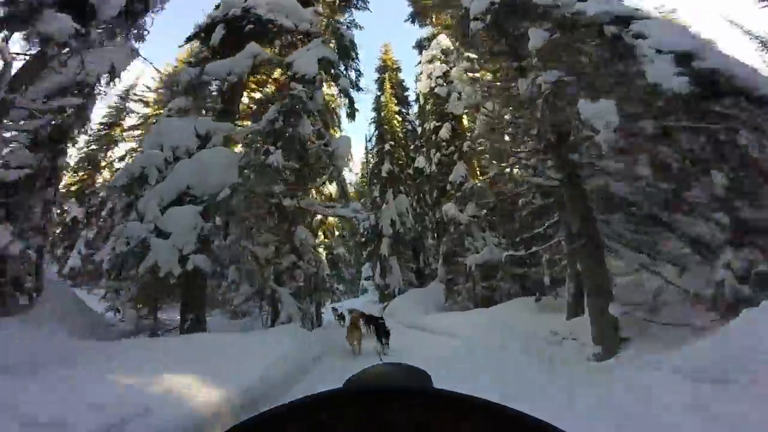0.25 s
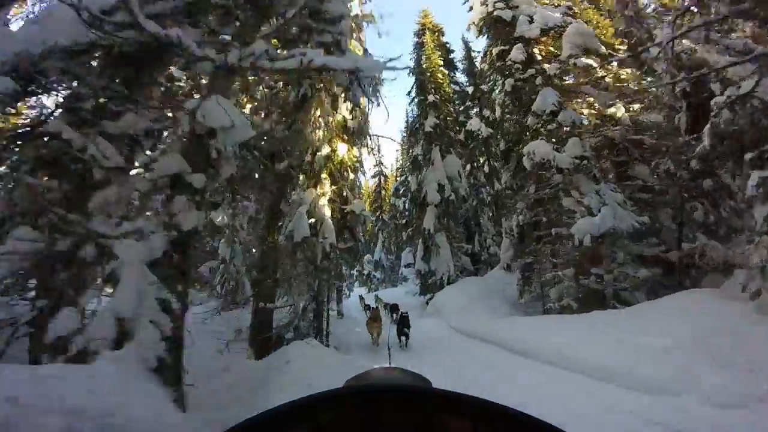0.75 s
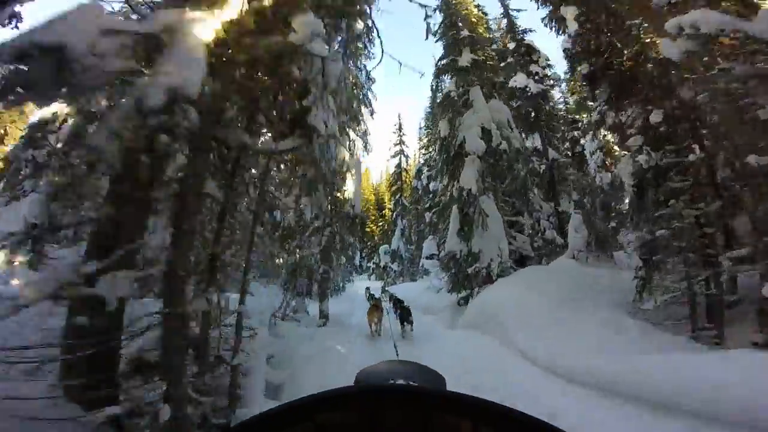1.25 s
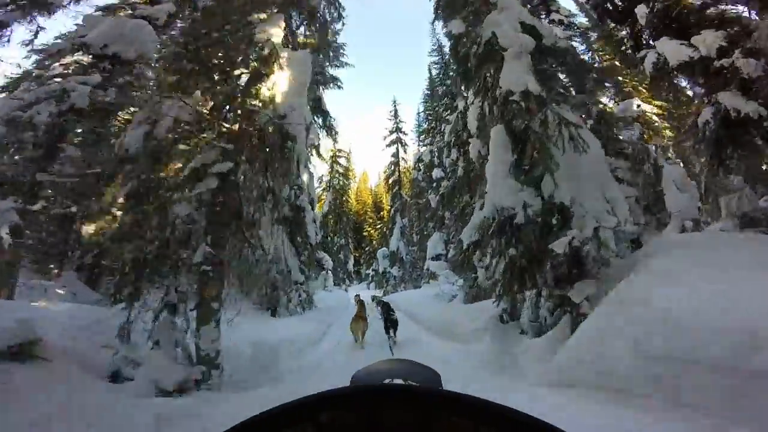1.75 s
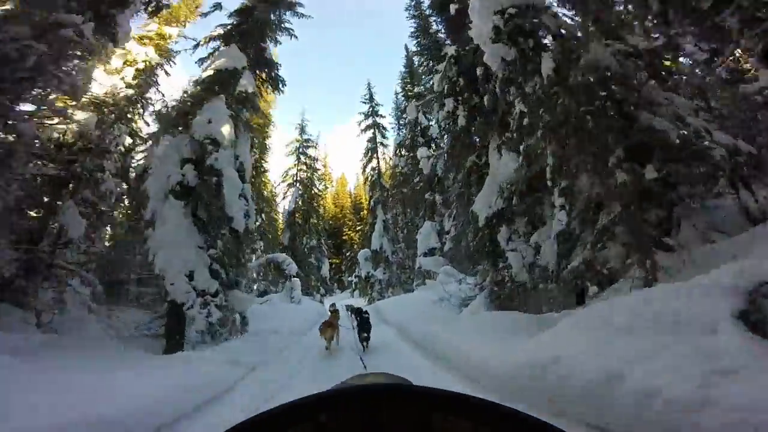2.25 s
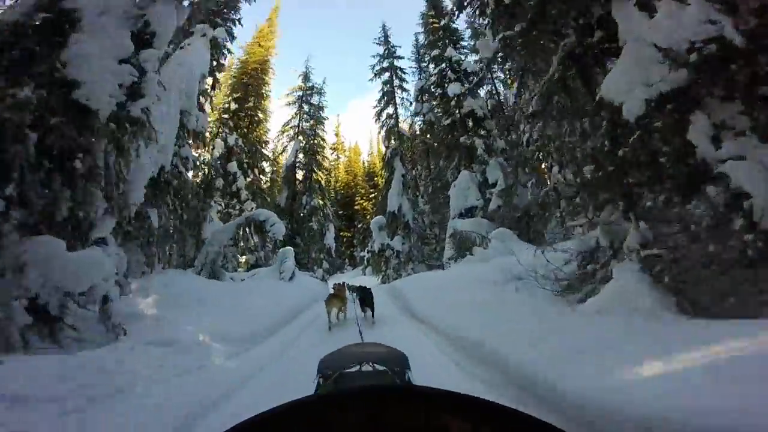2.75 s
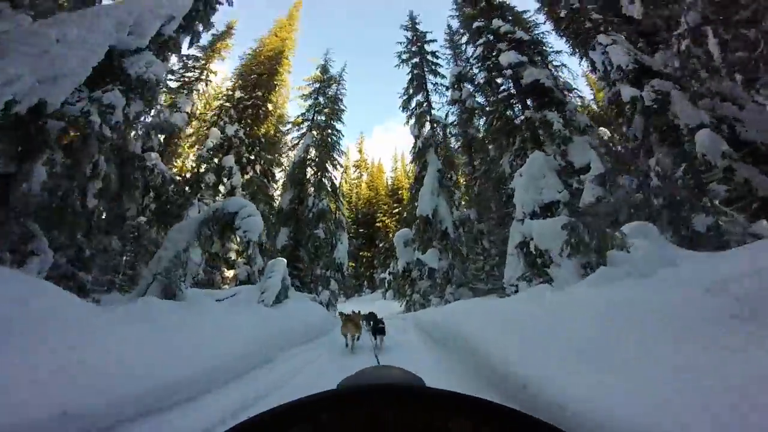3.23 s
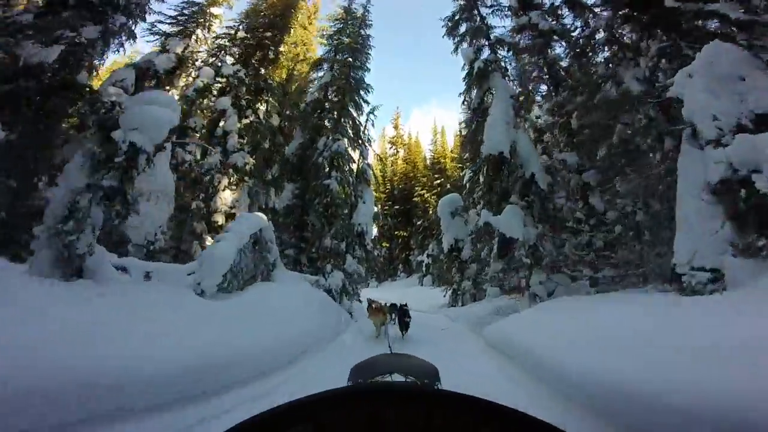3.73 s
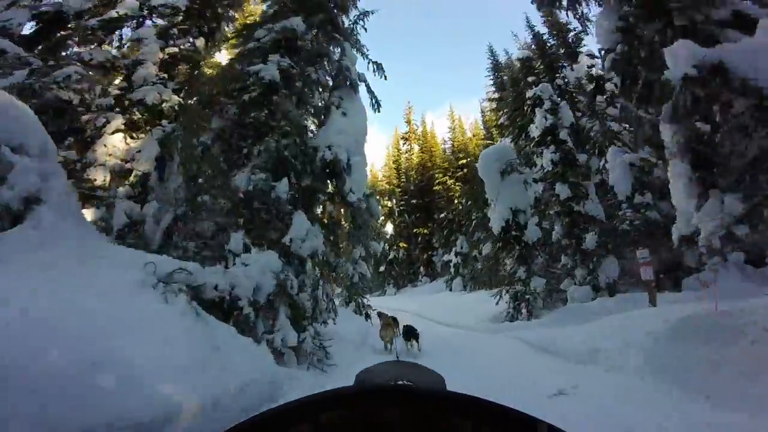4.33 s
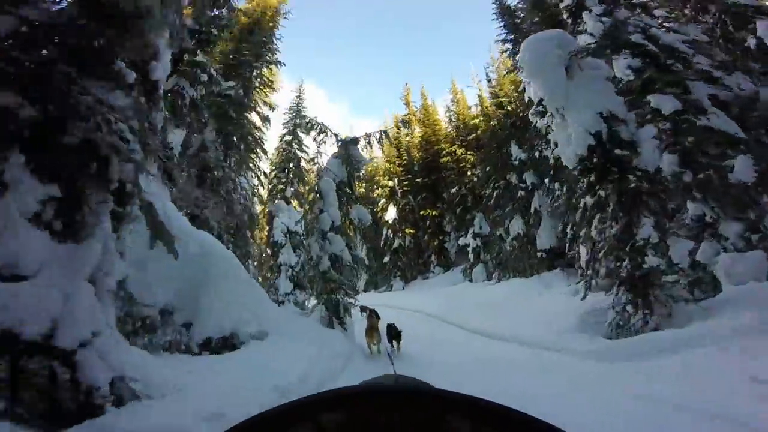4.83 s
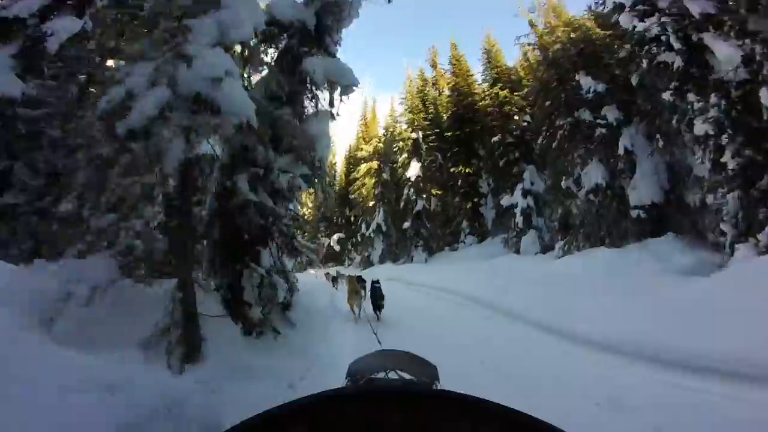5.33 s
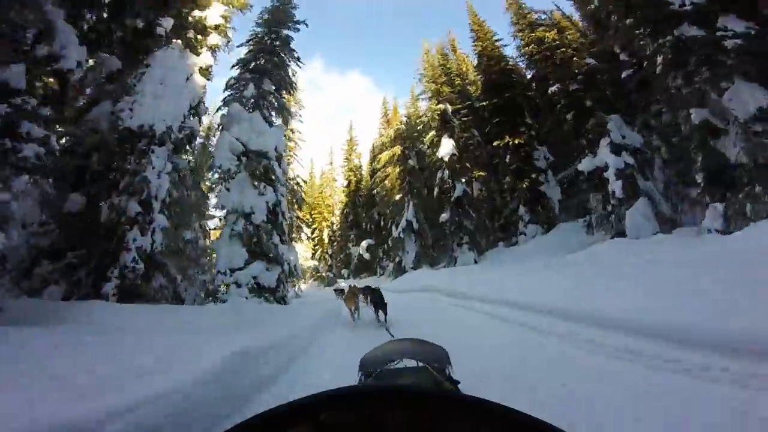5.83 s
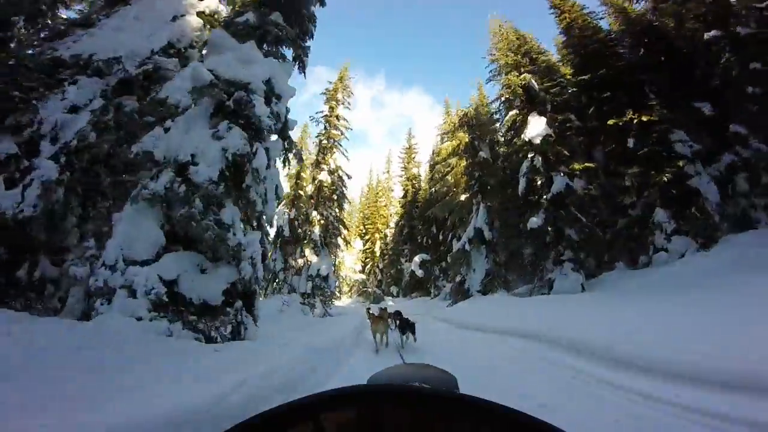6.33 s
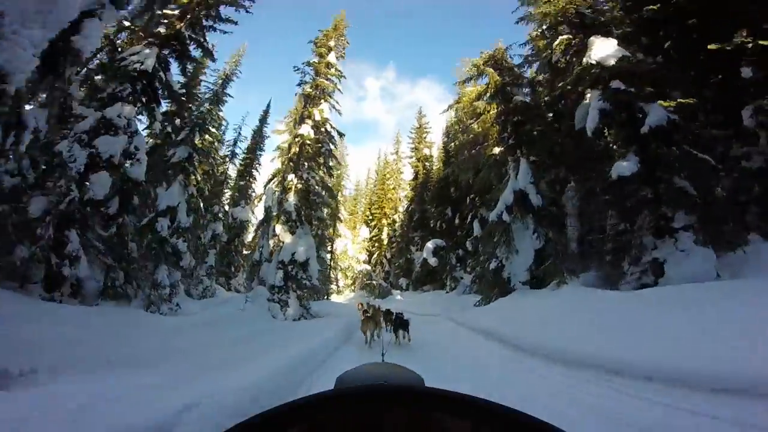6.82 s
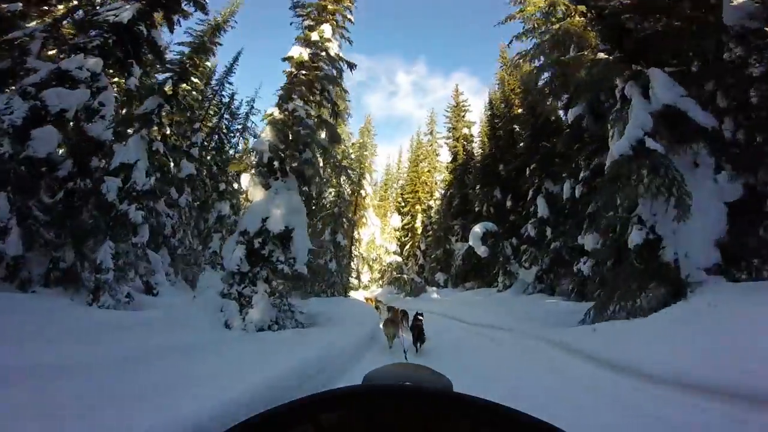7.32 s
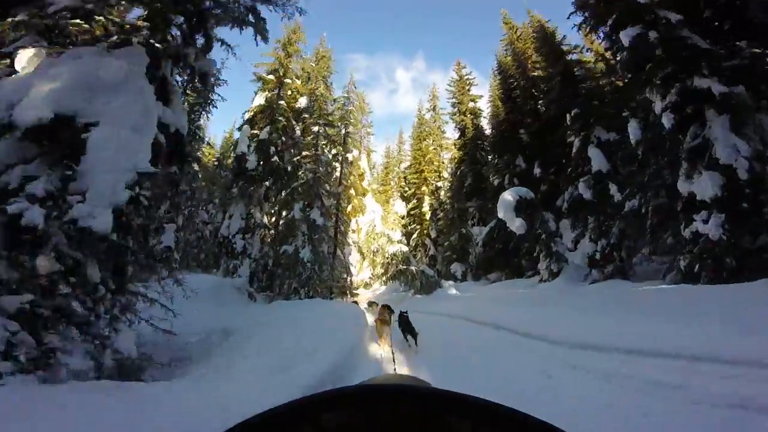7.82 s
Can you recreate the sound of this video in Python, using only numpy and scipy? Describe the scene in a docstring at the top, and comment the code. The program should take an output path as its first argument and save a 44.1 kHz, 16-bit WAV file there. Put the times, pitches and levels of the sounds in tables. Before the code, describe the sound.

A sled runs over packed snow, its runners making a steady, grainy hiss while ruts shake it into an uneven low rumble. A little after two seconds, hard bumps bring dull thumps and a cluster of sharp knocks from the joints; more follow a second later. Around five seconds come another heavy thump and short crusty scrapes, then the ride grows smoother. The microphone is fixed to the sled, close and without echo.

```python
"""A packed trail in a snowy forest, heard close up from a microphone fixed to a running dog sled.
The runners grind snow grains, which ring through the frame under a fine hiss of powder.
Ruts shake the sled into a low rumble; bumps thump, edges scrape on crust and the joints knock.
Now and then a runner sticks and slips with a thin squeal, and crumbs of ice tick against the sled."""
import sys
import numpy as np
from scipy import signal
from scipy.fft import rfft, irfft
from scipy.io import wavfile
from scipy.ndimage import uniform_filter1d

SR = 44100
rng = np.random.default_rng(int(sys.argv[2]) if len(sys.argv) > 2 else 0)


def pcm_store(signal):
    """Save signal as 16-bit PCM."""
    levels = np.round(np.clip(np.atleast_2d(signal), -1, 1) * 32767)
    wavfile.write(sys.argv[1], SR, levels.astype(np.int16).T)


N = 355887
TIME = np.arange(N) / SR
BINS = np.fft.rfftfreq(16384, 1 / SR)  # Hz
BOUNCE_HZ, BEND_HZ, MODE_T60_S = 124.7, 61, 0.11  # the sled's two low modes

# Resonances of the frame. Each row: centre in Hz, width in Hz, lift in dB.
FRAME = [(411.2, 83, 12.5), (937, 20, 3.5), (1277, 230, 7), (1425, 180, 9), (1594, 220, 12.5),
         (2123, 70, 6.5), (2406, 160, 8.5), (2598, 210, 9.5), (2877, 190, 1), (3450, 69, 6.5),
         (4090, 250, 3), (6330, 1300, 9.5), (7340, 470, 6)]
# Runner edges biting crust. Each row: start in seconds, length in seconds, relative dB, brightest Hz.
SCRAPES = [(0.779, .05, -45, 2020), (0.898, .04, -49, 1900), (1.244, 0.079, -49.5, 1960),
           (1.751, 0.056, -46, 1510), (2.289, 0.052, -40, 2350), (2.391, 0.05, -42.5, 2460),
           (2.607, 0.063, -43.5, 2500), (3.29, 0.085, -47.5, 2500), (3.4, 0.039, -44, 2300),
           (3.997, 0.055, -50, 1840), (4.946, 0.071, -36, 2230), (5.041, 0.069, -41.5, 2370),
           (5.114, 0.066, -37.5, 2050), (5.152, 0.027, -40, 1710), (6.338, 0.17, -46, 2200),
           (6.614, 0.039, -44, 1890), (6.752, 0.11, -42.5, 2060), (7.983, 0.045, -40.5, 2290)]


def runners(grind):
    """Two runners grind grains in uneven spurts; each rings the frame with a wavering brightness."""
    # Spectrum of breaking grains. Each row: frequency in Hz, gain in dB.
    grain_colour = [(100, -39), (450, 3.5), (700, -5), (1050, -4), (1900, 1.5), (3000, 0), (3800, -9),
                    (5200, -19), (8000, -24.5), (15000, -48.5)]
    highpass = signal.butter(2, 2000, "high", fs=SR, output="sos")
    out = np.zeros(N)
    for _ in range(2):
        grit = grains(per_s=7000, spread_db=2.5) * gain_of(1.67 * wander(rate=25))
        runner = colour(grit, spectrum(grain_colour) + lift(FRAME))
        treble = signal.sosfiltfilt(highpass, runner)
        out += runner + treble * (gain_of(1.2 * wander(rate=16)) - 1)
    return gain_of(-1.3) * grind * unit_rms(out)


def rumble(jolting):
    """Ruts jolt the sled on its springy frame, over the soft drone of smooth snow."""
    # Spectra of the jolts and of the drone. Each row: frequency in Hz, gain in dB.
    rumble_colour = [(8, 3.5), (27, -9), (55, -3.5), (100, 0), (150, -8), (200, -24.5), (300, -31.5),
                     (500, -39), (1200, -70)]
    drone_colour = [(10, 3), (30, 15), (70, 5.5), (100, 2.5), (200, 4.5), (320, -1), (450, -6.5), (700, -8),
                    (1500, -16), (4000, -78)]
    jolts = grains(per_s=260, spread_db=2.0)
    shake = colour(jolts, spectrum(rumble_colour) + lift([(BOUNCE_HZ, 28, 8)]))
    # The sled swings as far as the ruts are deep, however thickly the jolts come.
    swing = np.sqrt(uniform_filter1d(shake ** 2, size=3000) + 1e-9 * np.mean(shake ** 2))
    flex = rng.standard_normal(N) * gain_of(1.6 * wander(rate=16))
    drone = colour(flex, spectrum(drone_colour) + lift(FRAME) + lift([(BOUNCE_HZ, 25, 7)]))
    return jolting * unit_rms(shake / swing) + gain_of(-49.5) * unit_rms(drone)


def bumps():
    """Each bump sets the sled bouncing; the harder it is, the more the frame bends, an octave lower."""
    # Bumps in the trail. Each row: start in seconds, strength in dB.
    hits = [(.735, -29), (2.309, -9), (2.552, -18), (2.604, -25), (2.64, -20.5), (2.687, -32), (3.291, -26),
            (3.347, -18), (3.431, -12.5), (3.521, -23.5), (3.563, -29), (4.987, -8.5), (5.004, -16),
            (5.178, -16.5), (5.214, -16.5), (6.993, -20.5), (7.245, -15.5)]
    out, t = np.zeros(N), np.arange(SR // 2) / SR
    envelope = (1 - np.exp(-t / 0.0054)) * gain_of(-60 * t / MODE_T60_S)
    bounce = np.sin(2 * np.pi * BOUNCE_HZ * t)
    bend = np.sin(2 * np.pi * BEND_HZ * t)
    hardest_db = max(db for _, db in hits)
    for start, db in hits:
        thump = bounce + gain_of(-5.5 + 1.4 * (db - hardest_db)) * bend
        add(out, start, gain_of(db) * thump * envelope)
    return out


def knocks():
    """A joint strikes home and chatters for a moment."""
    # Joint strikes. Each row: start in seconds, peak in dB, brightest Hz, chatter decay in seconds.
    strikes = [(1.556, -34, 1680, .001), (2.311, -27.5, 1490, 0.00054), (2.6388, -17.5, 2600, 0.0018),
               (2.652, -20.5, 2370, 0.0034), (2.685, -23.5, 1670, 0.004), (2.715, -36, 3600, 0.00062),
               (3.306, -31.5, 1620, 0.0021), (3.4267, -26, 1650, 0.0026), (3.5095, -33.5, 1570, 0.0009),
               (3.6233, -26, 2140, 0.0023), (4.4401, -32.5, 1570, 0.00096)]
    out, t = np.zeros(N), np.arange(SR // 10) / SR
    for start, db, hz, chatter in strikes:
        blow = rng.standard_normal(len(t)) * np.exp(-t / chatter)
        blow[0] += 7  # the first hard strike
        knock = colour(blow, contact(hz, slope_db=24.0, ring=0.82, body_db=-7.5))
        add(out, start, gain_of(db) * knock / abs(knock).max())
    return out


def scrapes():
    """Coarse crust breaks at once under a runner edge, then crumbles away."""
    out, crust = np.zeros(N), grains(per_s=1700, spread_db=1.0)
    for start, length, db, hz in SCRAPES:
        envelope = bite(length)
        burst = envelope * np.roll(crust, -round(start * SR))[:len(envelope)]
        scrape = colour(burst, contact(hz, slope_db=13, ring=1.0, body_db=-7))
        add(out, start, gain_of(db - 3.5) * unit_rms(scrape))
    return out


def squeals():
    """A runner sticks and slips, feeding one narrow resonance: a thin, fuzzy whistle."""
    # Spells of slipping. Each row: start and length in seconds, level in dB, pitch and width in Hz.
    spells = [(0.02, .27, -57.5, 3450, 300), (0.41, 0.14, -59, 3430, 300), (0.48, .04, -62, 4370, 200),
              (5.805, 0.25, -54, 1210, 330)]
    out = np.zeros(N)
    slips = grains(per_s=3500, spread_db=4.5) * gain_of(3.5 * wander(rate=39))
    for start, length, db, hz, width in spells:
        drive = slips[round(start * SR):][:int(length * SR)]
        whistle = colour(drive, -20 * np.log10(1 + (2 * (BINS - hz) / width) ** 2))
        add(out, start, gain_of(db) * unit_rms(whistle) * signal.windows.tukey(len(drive), .3))
    return out


def crumbs():
    """Bits of ice tick brightly against the sled."""
    # Ice hitting the sled. Each row: start in seconds, peak in dB, patter decay in seconds.
    hits = [(1.344, -52, .006), (1.612, -57, .013), (1.670, -52, .013), (3.176, -54, .015),
            (4.214, -53.5, 0.022), (4.288, -55, .012), (4.535, -51.5, 0.052), (4.79, -54, .012),
            (5.108, -50, .02), (5.709, -53, .013), (6.119, -58, .013)]
    out, t = np.zeros(N), np.arange(SR // 8) / SR
    for start, db, decay in hits:
        patter = rng.standard_normal(len(t)) * np.exp(-t / decay)
        tick = colour(patter, contact(8700, slope_db=41, ring=1.8, body_db=-26))
        add(out, start, gain_of(db) * tick / abs(tick).max())
    return out


def powder(grind):
    """Fine snow hisses past the runners, more under pressure and in drifts; scrapes throw up a spray."""
    # Spectrum of the powder. Each row: frequency in Hz, gain in dB.
    powder_colour = [(1500, -5.5), (4500, -0.5), (6500, -11.5), (8300, -2), (10000, -8), (12000, -14.5),
                     (15000, -18)]
    # Soft drifts swishing past. Each row: start in seconds, length in seconds, hiss in dB.
    drifts = [(.37, .14, -62.5), (.9, 0.18, -67), (4.2, 0.1, -63), (5.17, .16, -64), (5.69, .07, -66),
              (5.86, .28, -64), (7.56, 0.29, -65)]
    hiss = colour(grains(per_s=16000, spread_db=3.0), spectrum(powder_colour) + lift(FRAME))
    pressed = gain_of(-63) * unit_rms(grind) ** 0.29  # 0.29 dB of hiss per dB of grinding
    power = pressed ** 2 + swells(drifts, rise_s=0.032, fall_s=0.031)
    for start, length, db, _ in SCRAPES:
        spray = gain_of(db - 20) * bite(length)
        add(power, start, spray ** 2)
    return gain_of(.5 * wander(rate=13)) * np.sqrt(power) * unit_rms(hiss)


def contact(hz, slope_db, ring, body_db):
    """The frame's response to a contact in dB: falling steeply above hz, and to a dull body below."""
    # How the frame passes on a blow or scrape. Each row: frequency in Hz, gain in dB.
    contact_colour = [(150, -5.5), (550, 7.5), (750, -2), (1400, 3), (4000, 2.5), (12000, -6.5)]
    octaves = np.log2((BINS + 1) / hz)
    fall = -slope_db * (np.sqrt(1 + (2 * octaves) ** 2) - 1)
    hump = np.where(octaves < 0, np.maximum(fall, body_db), fall)
    return ring * lift(FRAME) + spectrum(contact_colour) + hump


def bite(length):
    """The envelope of one scrape: the edge digs in, holds and lets go."""
    t = np.arange(int(2 * length * SR)) / SR
    return (1 - np.exp(-t / (0.059 * length))) * np.exp(-(t / length) ** 3)


def grains(per_s, spread_db):
    """Random clicks, as of snow crystals breaking, a few larger than the rest."""
    size = gain_of(spread_db * np.minimum(rng.exponential(1, N), 5))
    return unit_rms(size * rng.choice([-1, 1], N) * (rng.random(N) < per_s / SR))


def swells(stretches, rise_s, fall_s):
    """The power at every sample of stretches that each rise, hold and fall."""
    power, t = np.zeros(N), np.arange(SR) / SR
    for start, length, db in stretches:
        swell = (1 - np.exp(-t / rise_s)) * np.exp(-np.maximum(t - length, 0) / fall_s)
        add(power, start, (gain_of(db) * swell) ** 2)
    return power


def wander(rate):
    """A random drift of rms 1, changing up to about rate times a second."""
    hz = np.fft.rfftfreq(N, 1 / SR)
    noise = rfft(rng.standard_normal(N))
    return unit_rms(irfft(noise * hz / (hz + 2) / (1 + (hz / rate) ** 2), N))


def colour(x, db):
    """Minimum-phase filter with db of gain at every bin, so that resonances ring after each pulse."""
    cepstrum = irfft(np.log(gain_of(np.maximum(db, db.max() - 100))))
    half = len(cepstrum) // 2
    cepstrum[1:half] *= 2
    cepstrum[half + 1:] = 0
    impulse_response = irfft(np.exp(rfft(cepstrum)))[:half]
    return signal.oaconvolve(x, impulse_response)[:len(x)]


def spectrum(points):
    """The dB at every bin, joining the points on a log-frequency axis."""
    hz, db = np.transpose(points)
    return np.interp(np.log(BINS + 1), np.log(hz + 1), db)


def lift(modes):
    """The dB that a set of resonances adds at every bin."""
    return sum(db / (1 + (2 * (BINS - hz) / width) ** 2) for hz, width, db in modes)


def gain_of(db):
    """Decibels to amplitude."""
    return 10 ** (np.asarray(db) / 20)


def unit_rms(x):
    """Scales to rms 1."""
    return x / np.sqrt(np.mean(x ** 2) + 1e-20)


def add(mix, start, sound):
    """Mixes a sound in at start seconds."""
    part = mix[round(start * SR):][:len(sound)]
    part += sound[:len(part)]


def scene():
    """Everything reaches the microphone through the sled, in mono; the snowy forest gives no echo."""
    # How hard the runners press into the snow. Each row: time in seconds, relative grinding in dB.
    pressure = [(0, -49), (.15, -45), (.62, -47.5), (1.2, -45.5), (1.43, -50), (1.55, -43), (1.85, -45.7),
                (2.15, -49), (2.5, -47), (2.85, -50), (3.8, -49.5), (4.4, -47.5), (4.7, -49), (5.15, -44),
                (5.45, -48), (6.1, -44.5), (6.25, -49.5), (6.95, -46.5), (7.5, -48), (8.06, -44.5)]
    # Rutted stretches of trail. Each row: start in seconds, length in seconds, rumble in dB.
    ruts = [(0.174, .3, -42), (0.312, 0.093, -36), (0.619, 0.16, -32.5), (.85, 0.075, -35.5),
            (1.0, 0.28, -35.5), (1.583, 0.051, -36), (1.86, 0.032, -31), (1.974, 0.025, -35),
            (2.235, 0.24, -32.5), (2.51, .19, -30), (2.916, .07, -41), (3.271, 0.32, -32),
            (3.98, 0.32, -33.5), (4.9, .14, -29.5), (5.104, 0.19, -30), (5.613, 0.084, -35),
            (6.063, 0.076, -37), (6.35, .11, -35.5), (6.74, 0.27, -35.5), (7.06, 0.24, -34.5),
            (7.352, 0.32, -41), (7.657, .37, -34.5)]
    smooth = gain_of(-53.5)  # the little shaking left on smooth snow
    jolting = np.sqrt(smooth ** 2 + swells(ruts, rise_s=0.016, fall_s=0.033))
    grind = gain_of(np.interp(TIME, *np.transpose(pressure)))
    grind *= (jolting / smooth) ** 0.045  # ruts make the runners grind a little harder
    sliding = runners(grind) + squeals() + powder(grind)
    return (sliding + rumble(jolting) + bumps() + scrapes() + knocks() + crumbs())[None]


def record(dry):
    """The microphone on the sled takes in nothing above about 15 kHz."""
    lowpass = signal.firwin(511, 15000, window=("kaiser", 9), fs=SR)
    return signal.oaconvolve(dry, lowpass[None], "same")


dry = scene()
out = record(dry)
pcm_store(out)
```